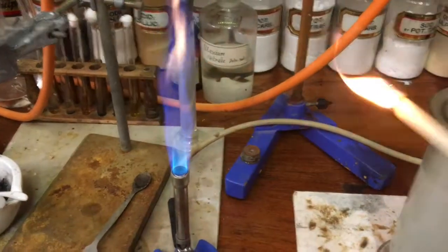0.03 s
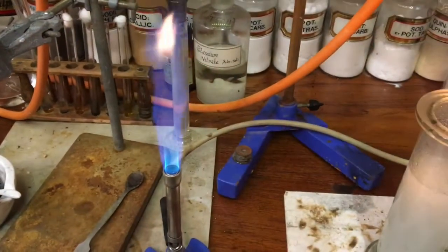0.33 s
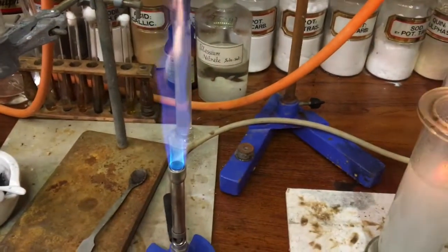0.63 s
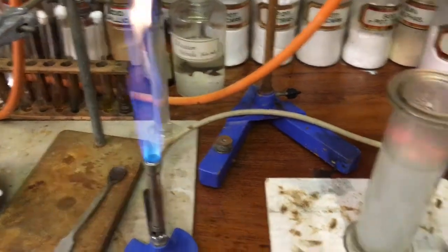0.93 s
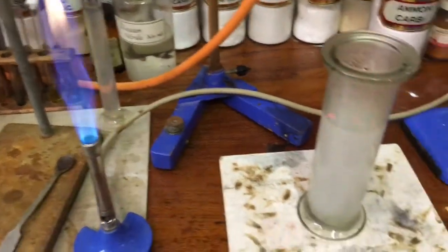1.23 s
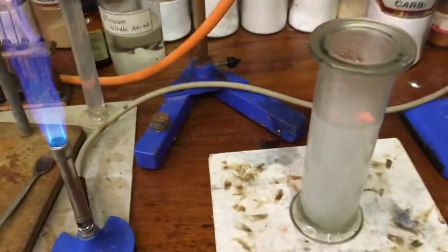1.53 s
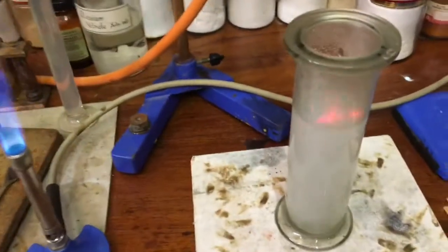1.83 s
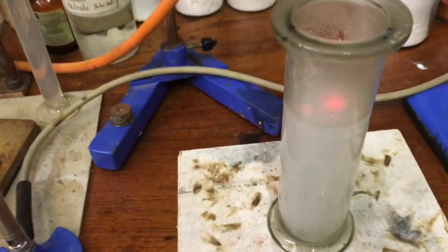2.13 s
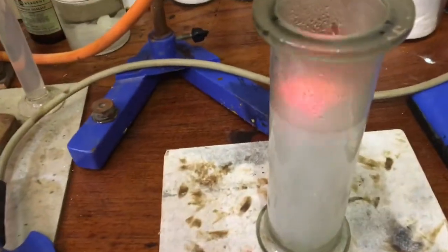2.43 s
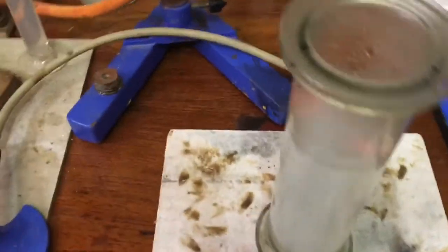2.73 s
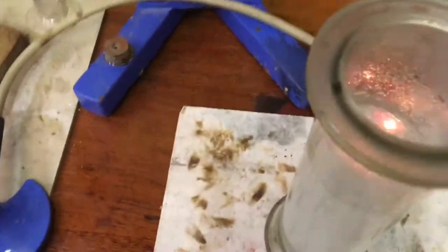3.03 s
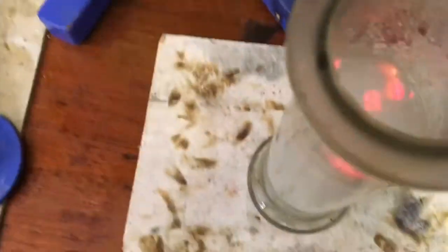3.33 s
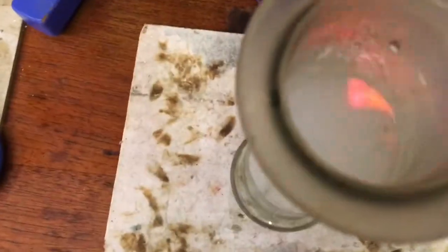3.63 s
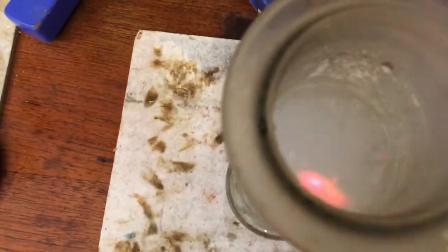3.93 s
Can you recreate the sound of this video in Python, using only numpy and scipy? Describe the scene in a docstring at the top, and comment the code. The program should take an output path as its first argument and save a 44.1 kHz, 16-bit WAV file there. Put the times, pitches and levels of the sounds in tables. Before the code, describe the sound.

Sputtering pops come from a glass cylinder on a lab bench after a sudden bang, with a crackly hiss, a thin whistle and a faint burner behind. They get closer, denser and louder, and a draught rumbles on the microphone.

```python
"""A reaction burns in a tall glass cylinder on a lab bench: it catches with a bang, then sputters.
Each pop is a pressure pulse that briefly excites the normal modes of the gas column. Beneath the pops
runs a crackling hiss, which drives the tube's cross modes into a thin whistle; a gas burner hisses
faintly alongside. As the microphone moves up to the mouth, the reaction grows louder, the room
recedes and a draught rumbles on the microphone."""
import sys
import numpy as np
from scipy import signal
from scipy.fft import rfft, irfft
from scipy.io import wavfile

SR = 44100
rng = np.random.default_rng(int(sys.argv[2]) if len(sys.argv) > 2 else 0)


def to_wav(s):
    """Save 16-bit WAV."""
    ch = np.atleast_2d(s).T  # columns
    pcm = np.round(np.clip(ch, -1, 1) * 32767)  # PCM
    wavfile.write(sys.argv[1], SR, pcm.astype(np.int16))


N = 176400
TIME = np.arange(N) / SR

# The loud pops in the cylinder. Each row: start in seconds, level in dB.
LOUD_POPS = [(0.6198, -11), (0.696, -11), (0.7106, -8), (0.752, -12.5), (0.8061, -5), (0.8211, -4.5),
             (1.0169, -10), (1.0751, -5.5), (1.1215, -10), (1.1693, -20.5), (1.2686, -1.5), (1.3822, -11.5),
             (1.3935, -7), (1.4049, -8), (1.6167, -8.5), (1.7005, -10), (1.7499, -12.5), (1.8071, -2.5),
             (1.9011, -11.5), (1.9376, -9.5), (1.9505, -11), (2.002, -.5), (2.0445, -7), (2.0567, -8),
             (2.1787, -2), (2.2331, -6), (2.3111, -10.5), (2.3725, -8), (2.4463, -2.5), (2.4898, -6),
             (2.5559, -10), (2.5881, -10.5), (2.5978, -5.5), (2.669, -10.5), (2.7376, -12), (2.8151, -12),
             (2.8231, -7), (2.8374, -3.5), (2.8732, -7.5), (2.8862, -4), (2.8963, -11), (2.9378, -6),
             (2.965, -2), (2.9734, 2.5), (2.9827, -4), (2.9928, -12), (3.0077, -5), (3.0225, -12),
             (3.0341, -8.5), (3.0568, -5), (3.0695, -9), (3.1198, -10.5), (3.1323, -6.5), (3.2162, -10),
             (3.2219, -8.5), (3.2389, -7), (3.2706, -3.5), (3.2863, -4.5), (3.3139, -7), (3.4205, -8.5),
             (3.4338, 3), (3.4407, 2.5), (3.462, -10.5), (3.5242, -1.5), (3.5464, 2), (3.5986, -11.5),
             (3.6039, -5.5), (3.6228, -6), (3.6807, 2), (3.6971, -1), (3.7129, -3.5), (3.7385, -9),
             (3.7516, -6), (3.7707, -7.5), (3.822, -8), (3.8385, -14.5), (3.8466, -8), (3.8928, -4.5),
             (3.9048, -2.5), (3.9195, -11), (3.9557, -6), (3.9731, -2)]
IGNITION_S = 0.497
PUFF_DECAY_S, EDGE_DECAY_S = 0.0051, 0.0034
SOFTENING_HZ = 2220  # low-pass corner of the ringing and of the rush of flame


def sputter():
    """Impulse excitation: loud pops, and a Poisson process of small ones, ring the gas column."""
    # Each row: mode frequency in Hz, relative level in dB, time to decay by 60 dB in seconds.
    column_modes = [(130.6, -23, 0.063), (384, -17.5, 0.03), (1021, -0.5, 0.0099), (1171.7, -2.5, 0.028),
                    (1867, -15.5, 0.031), (2420, -25, 0.057)]
    # The small pops. Each row: time in seconds, typical level in dB.
    simmer_curve = [(0.519, -25), (1.4, -20), (2.9, -21), (3.15, -26), (3.45, -19)]
    pops_per_s, spread_db = 77, 4
    seconds, db = np.transpose(simmer_curve)
    starts = TIME[(rng.random(N) < pops_per_s / SR) & (TIME > seconds[0])]
    scatter_db = spread_db * np.minimum(rng.standard_normal(len(starts)), 1)
    small_pops = np.column_stack([starts, np.interp(starts, seconds, db) + scatter_db])
    return pops(LOUD_POPS, column_modes) + pops(small_pops, column_modes)


def pops(events, modes):
    """Transient radiation: each pop rings the column and expels a dull puff, with a faint bright edge."""
    puff = from_db(-0.5) * filtered(bursts(events, PUFF_DECAY_S), (86, 763), "band")
    edge = from_db(-25.5) * filtered(bursts(events, EDGE_DECAY_S), (2000, 6000), "band")
    return column_ring(events, modes) + puff + edge


def column_ring(events, modes, size=4096):
    """Modal superposition: damped sinusoids, whose tuning and balance uneven heat alters at each pop."""
    attack_s, max_detuning, spread_db, fade_db_per_s = 0.00047, 0.05, 3, 3.5
    hz, db, t60 = np.transpose(modes)[:, :, None]
    t, out = np.arange(size) / SR, np.zeros(N + size)
    envelopes = from_db(db - 60 * t / t60) * (1 - np.exp(-t / attack_s))
    softening = signal.butter(4, SOFTENING_HZ, fs=SR)
    chances = rng.uniform(-1, 1, (len(events), 2, len(hz), 1))
    for (start_s, level_db), (balance, tuning) in zip(events, chances):
        # The upper modes weaken as the fire sinks.
        fade_db = fade_db_per_s * (start_s - IGNITION_S) * (hz > 1500)
        gains = from_db(spread_db * balance - fade_db)
        tones = np.sin(2 * np.pi * hz * (1 + max_detuning * tuning) * t)
        wave = signal.lfilter(*softening, np.sum(envelopes * gains * tones, axis=0))
        start = min(int(start_s * SR), N)
        out[start:start + size] += from_db(level_db) * wave / np.abs(wave).max()
    return filtered(out[:N], 58, "high")


def ignition():
    """Sudden combustion: the gas heaves, three blasts ring the hot column and a fizzing rush dies away."""
    # Each row: start of a blast in seconds, level in dB.
    blasts = [(.4976, -0.5), (.4995, -6), (.5048, -5)]
    # The flame-filled column. Each row: frequency in Hz, relative level in dB, 60 dB decay in seconds.
    hot_modes = [(88, 1.5, 0.036), (993, 2.5, 0.028), (1336, 4, 0.033), (1610, 9.5, 0.011),
                 (1930, -1, 0.027), (2260, -10.5, 0.059)]
    flare_decay_s, heave_hz, heave_lead_s, heave_width_s = 0.22, 100, 0.014, 0.01
    age = TIME - IGNITION_S
    midrange = filtered(rng.standard_normal(N), (1100, 1800), "band")
    rush = from_db(-31.5) * unit_rms(filtered(midrange, SOFTENING_HZ, "low"))
    treble = filtered(rng.standard_normal(N), (7800, 10000), "band")
    fizz = from_db(-41.5) * unit_rms(treble) * crackling()
    flare = (rush + fizz) * (age > 0) * np.exp(-np.abs(age) / flare_decay_s)
    heave = np.sin(2 * np.pi * heave_hz * age) * np.exp(-((age + heave_lead_s) / heave_width_s) ** 2)
    crack = from_db(-8) * filtered(bursts(blasts, EDGE_DECAY_S), (5000, 5480), "band")
    return pops(blasts, hot_modes) + crack + flare + from_db(-24) * heave


def hiss():
    """Amplitude modulation: crackles roughen the gas noise and its whistle, which loud pops also ring."""
    # Each row: time in seconds, level of the hiss in dB.
    level_curve = [(.52, -41), (.78, -41.5), (.95, -44.5), (1.36, -50), (1.39, -38.5), (1.98, -55),
                   (2.1, -45.5), (2.62, -39.5), (2.79, -48), (2.84, -34.5), (3.33, -37), (3.43, -27),
                   (3.7, -33)]
    # Each row: frequency in Hz, relative spectral density in dB.
    spectrum = [(2000, 1.5), (2900, -12.5), (3900, 2), (7300, -2), (8600, 0), (10500, -6.5), (13000, -4),
                (16000, -1)]
    level_db, = in_time(level_curve)
    grain = crackling()
    pop_drive = from_db(18) * decays(LOUD_POPS, PUFF_DECAY_S)
    gas = from_db(level_db) * coloured_noise(spectrum) * grain
    return (gas + whistle() * np.hypot(grain, pop_drive)) * (TIME > IGNITION_S)


def spits():
    """Short transients have broad spectra: a few sharp spits of treble noise."""
    # Each row: start in seconds, relative level in dB.
    events = [(1.5255, -5), (1.708, -5), (1.802, -11), (2.859, -3.5), (3.231, 3), (3.261, 0.5), (3.985, 5)]
    return from_db(-16) * filtered(bursts(events, decay_s=0.0018), (3360, 13500), "band")


def whistle():
    """Transverse resonance: the hiss rings across the tube, higher in pitch when the gas is hotter."""
    # Each row: time in seconds, base frequency in Hz, level in dB.
    whistle_curve = [(.85, 5814, -55.5), (1.33, 5270, -52.5), (1.47, 6180, -48.5), (2.0, 5270, -53),
                     (2.06, 5746, -49), (2.62, 5760, -47), (2.78, 5060, -53), (3.45, 5180, -54.5),
                     (3.66, 5610, -48)]
    # Each row: ratio to the base frequency, relative level in dB.
    cross_modes = [(0.999, 1), (1.608, -7), (2.17, -4)]
    hz, db = in_time(whistle_curve)
    phase, out = 2 * np.pi * np.cumsum(hz) / SR, 0
    for ratio, mode_db in cross_modes:
        half_width_hz = 118 * ratio ** 2  # the upper modes are broader
        band = drift(half_width_hz) * np.cos(ratio * phase) + drift(half_width_hz) * np.sin(ratio * phase)
        out = out + from_db(mode_db) * unit_rms(band)
    return from_db(db) * out


def crackling():
    """Shot noise: tiny random crackles add up to an envelope whose level also flickers slowly."""
    crackles_per_s, spread_db, power_share, flicker_db = 300, 4, 0.88, 1.52
    sizes = from_db(spread_db * np.minimum(rng.exponential(1, N), 3.6))
    impulses = sizes * (rng.random(N) < crackles_per_s / SR)
    crackles = unit_rms(fading(impulses, decay_s=0.0011))
    return np.sqrt(1 - power_share + power_share * crackles ** 2) * from_db(flicker_db * drift(hz=5.9))


def burner():
    """Combustion noise: a steady gas flame flutters and crackles faintly."""
    # Each row: frequency in Hz, relative spectral density in dB.
    spectrum = [(40, -13), (330, -1.5), (550, -17.5), (1150, -11.5), (2700, -26), (4400, -21),
                (6800, -22.5), (13500, -17.5), (16000, -27)]
    flutter_db = 1.5 * drift(hz=114)
    return from_db(-48.5 + flutter_db) * coloured_noise(spectrum) * np.sqrt(crackling())


def draught():
    """Wind noise: moving air rumbles on the microphone as it nears the mouth."""
    # Each row: time in seconds, level in dB.
    level_curve = [(.55, -51), (2.65, -52.5), (2.85, -34), (3.55, -25)]
    # Each row: frequency in Hz, relative spectral density in dB.
    spectrum = [(20, -26), (43, -1), (72, -16.5), (2000, -45.5)]
    level_db, = in_time(level_curve)
    return from_db(level_db) * coloured_noise(spectrum)


def lab_room(direct):
    """Reflection and reverberation: a bench echo and a short tail recede as the microphone closes in."""
    # Each row: time in seconds, level of the tail relative to the direct sound in dB.
    room_curve = [(2.6, -11.5), (3.0, -15)]
    echo_s, t60_s = 0.0058, 0.27
    t = TIME[:SR // 2]
    response = rng.standard_normal(len(t)) * from_db(-60 * t / t60_s) * (t > echo_s)
    tail = signal.fftconvolve(direct, response / np.linalg.norm(response))[:N]
    echo = from_db(-7) * np.interp(TIME - echo_s, TIME, direct)
    room_db, = in_time(room_curve)
    return direct + from_db(room_db) * (echo + tail)


def bursts(events, decay_s):
    """White noise under a decaying envelope for each event."""
    return decays(events, decay_s) * rng.standard_normal(N)


def decays(events, decay_s):
    """An exponential decay for each event, given as start in seconds and level in dB."""
    starts, db = np.transpose(events)
    impulses = np.zeros(N)
    impulses[np.minimum((starts * SR).astype(int), N - 1)] = from_db(db)
    return fading(impulses, decay_s)


def fading(impulses, decay_s):
    """First-order relaxation: each impulse decays with the given time constant."""
    return signal.lfilter([1], [1, -np.exp(-1 / (decay_s * SR))], impulses + 1e-18)


def coloured_noise(spectrum):
    """Spectral shaping of white noise, at unit power."""
    hz, db = np.transpose(spectrum)
    bin_hz = np.arange(N // 2 + 1) * SR / N + 1e-3
    gain = from_db(np.interp(np.log(bin_hz), np.log(hz), db))
    return unit_rms(irfft(rfft(rng.standard_normal(N)) * gain, N))


def drift(hz):
    """Random fluctuation: low-pass noise of unit power."""
    return unit_rms(filtered(rng.standard_normal(N + SR), hz, "low")[SR:])


def filtered(x, hz, kind):
    """A maximally flat second-order filter, with corners no lower than 10 Hz."""
    sections = signal.butter(2, np.clip(hz, 10, .45 * SR), kind, fs=SR, output="sos")
    return signal.sosfilt(sections, x + 1e-18)


def in_time(curve):
    """Linear interpolation of each column against the first, sample by sample."""
    seconds, *columns = np.transpose(curve)
    return [np.interp(TIME, seconds, column) for column in columns]


def unit_rms(x):
    """Normalisation to unit power."""
    return x / np.sqrt(np.mean(x ** 2) + 1e-20)


def from_db(db):
    """Decibels to amplitude ratio."""
    return 10 ** (np.asarray(db) / 20)


def scene():
    """Superposition: the reaction in the room, the burner and the draught add in one channel."""
    reaction = sputter() + ignition() + hiss() + spits()
    return (lab_room(reaction) + burner() + draught())[None]


def record(dry):
    """Soft saturation rounds the highest peaks; a steep low-pass limits the bandwidth."""
    ceiling, cutoff_hz = 1.3, 15850
    rounded = dry / (1 + (dry / ceiling) ** 4) ** .25
    return signal.sosfilt(signal.ellip(12, .1, 90, cutoff_hz, fs=SR, output="sos"), rounded)


dry = scene()
out = record(dry)
to_wav(out)
```